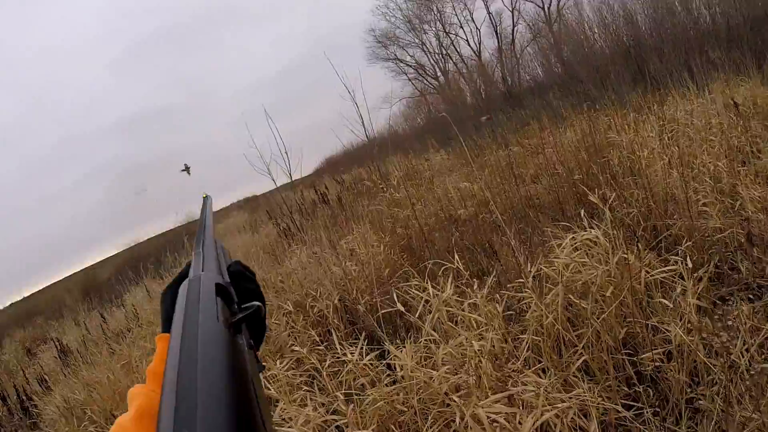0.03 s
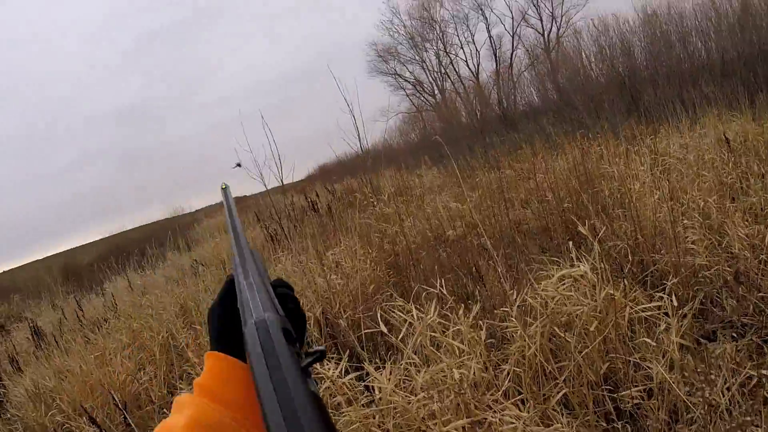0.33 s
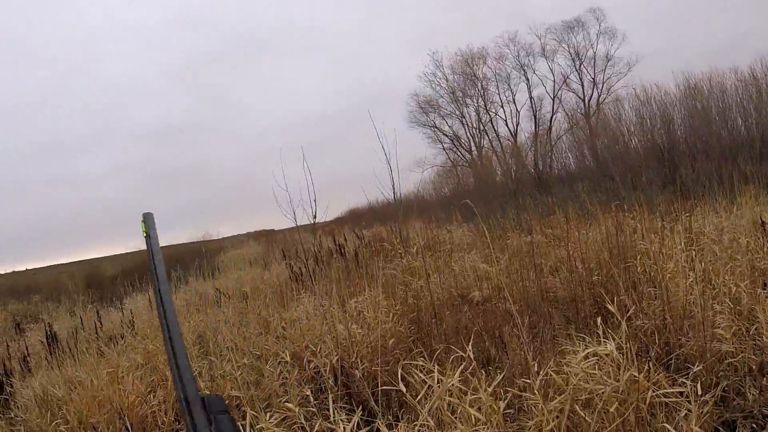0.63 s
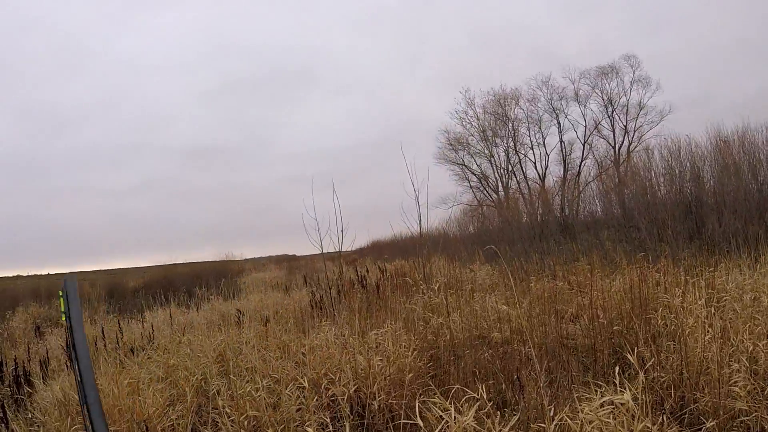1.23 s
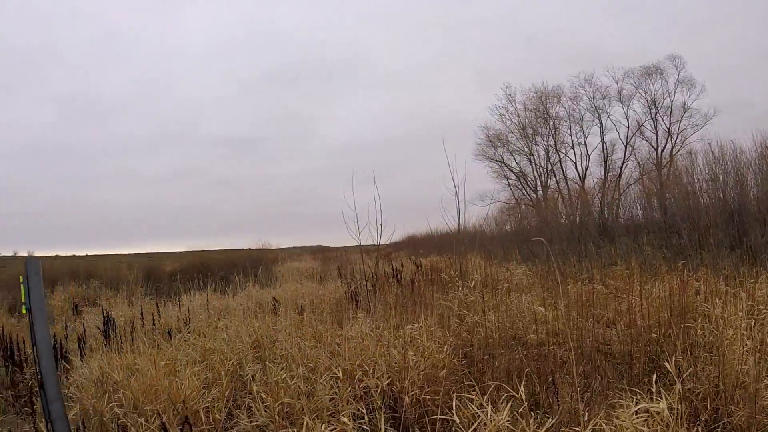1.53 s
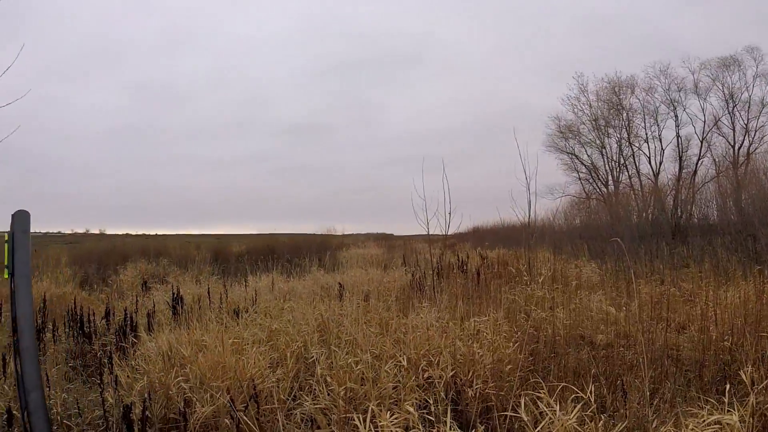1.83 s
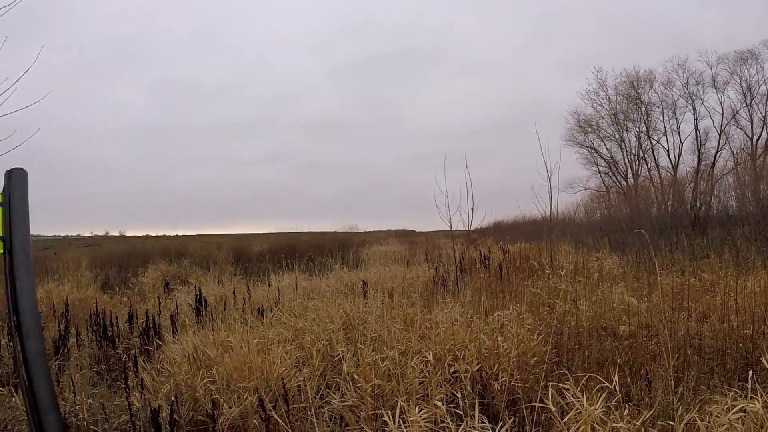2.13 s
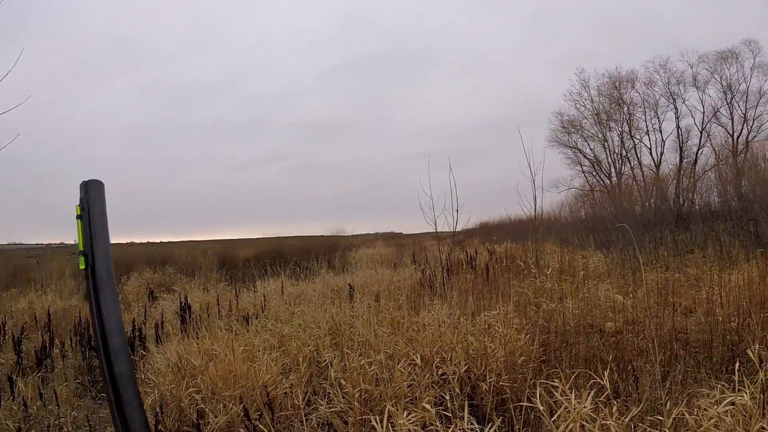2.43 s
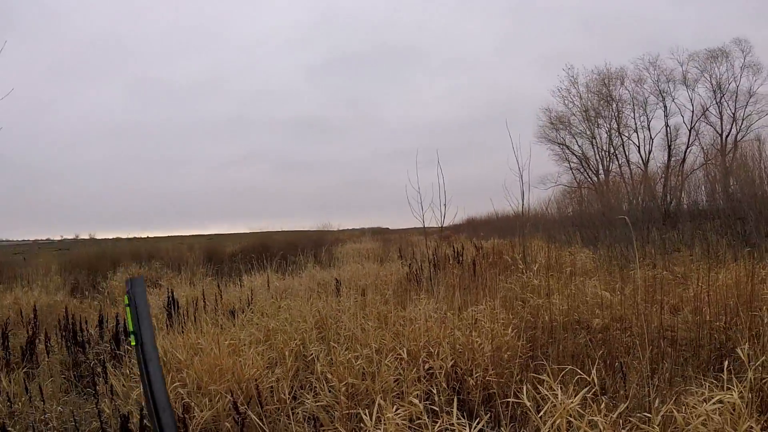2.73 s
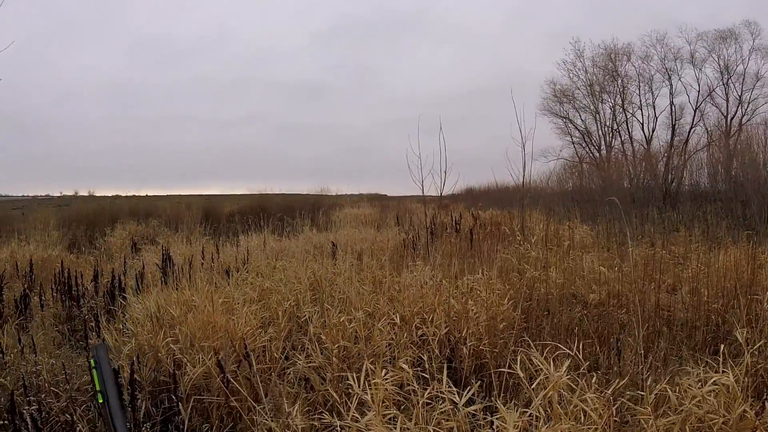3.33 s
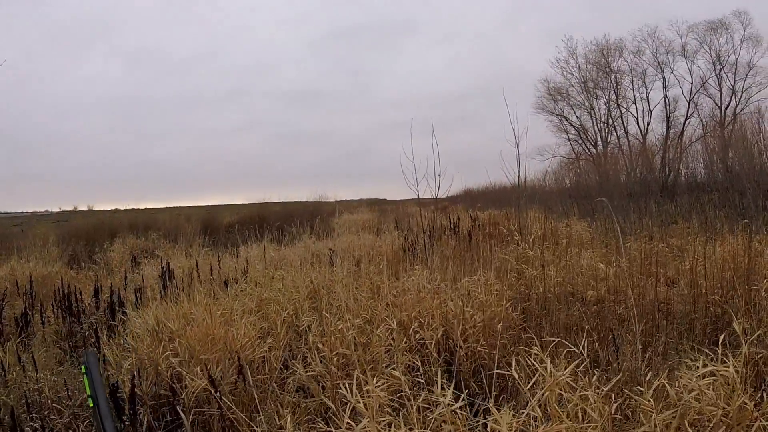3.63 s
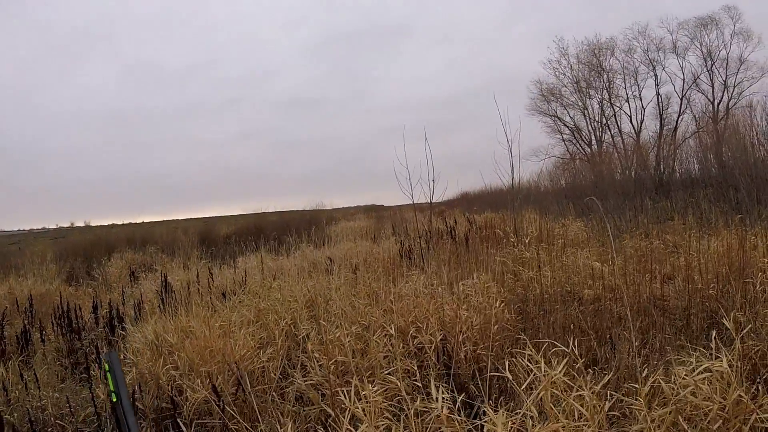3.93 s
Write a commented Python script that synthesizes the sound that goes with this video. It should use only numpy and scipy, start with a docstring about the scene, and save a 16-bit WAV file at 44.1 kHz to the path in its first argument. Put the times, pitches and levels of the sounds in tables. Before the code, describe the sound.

A shotgun's action clacks sharply as the shot's brief echo dies over an open field. Soft handling bumps and a metallic click follow, then wind gusts rumble ever harder on the close microphone, with hiss and a faint distant bird.

```python
"""A shotgun's echo dies away over a reed field while the gun's action clacks.
Soft bumps and small ticks follow as the gun is lowered, then a catch clicks; clack and click
are impacts that ring the modes of the metal. Turbulent gusts buffet the microphone ever harder,
a far bird calls faintly, and background hiss swells as the recorder's gain recovers after the shot."""
import sys
import numpy as np
from scipy import signal
from scipy.fft import rfft, irfft, next_fast_len
from scipy.io import wavfile
from scipy.ndimage import uniform_filter1d, map_coordinates

SR = 44100
rng = np.random.default_rng(int(sys.argv[2]) if len(sys.argv) > 2 else 0)


def wav_record(signal):
    """Record a signal, one row per channel, as 16-bit PCM in the file named by sys.argv[1]."""
    frames = np.transpose(np.atleast_2d(signal))
    bounded = np.clip(frames, -1, 1)
    # unit amplitude maps onto the largest positive 16-bit level
    quanta = np.round(bounded * 32767).astype(np.int16)
    wavfile.write(sys.argv[1], SR, quanta)


N = 176400
T = np.arange(N) / SR

# impacts in the action and of the catch on its seat (time [s], relative level [dB])
ACTION_IMPACTS = [(0.0082, -19), (0.0087, -24), (0.0092, -24), (0.0102, -28), (0.0107, -29), (0.0122, -34),
                  (0.0185, -42), (0.0284, -44), (0.0322, -39.5), (0.0365, -39), (0.0478, -40), (0.138, -52),
                  (0.165, -59)]
CATCH_IMPACTS = [(1.6903, -23), (1.7205, -24), (1.7212, 0), (1.7216, -4), (1.7220, -8), (1.7224, -6),
                 (1.7228, -3), (1.7236, -14), (1.7292, -26), (1.7322, -28)]
# modes of the action and of the steel (frequency [Hz], relative level [dB], decay time T60 [s])
ACTION_MODES = [(348, -6.5, 0.032), (526, -12, 0.012), (815, -17.5, 0.03), (1340, -31, 0.013),
                (1890, -12, 0.013), (2105, -11, 0.018), (2600, -17.5, 0.055), (3160, -1, 0.0075),
                (3830, -49, .55), (3870, -15, 0.0042), (5360, -1, 0.0033), (6000, -6, 0.0065),
                (6650, -1.5, 0.0078), (7460, -33, 0.04)]
STEEL_MODES = [(750, -32, 0.04), (1030, -6.5, 0.04), (1497, -15.5, 0.06), (1840, -23, 0.03),
               (2105, -11.5, 0.032), (2720, -3, 0.0036), (3160, -13, .016), (3560, -13, 0.012),
               (4420, -9, 0.0057), (5430, -3, 0.0076), (5710, -13, 0.0061), (6830, -13, 0.011),
               (7160, -23, 0.0065), (7960, -16.5, 0.0087), (9450, -21, 0.008), (10070, -8.5, 0.0021),
               (13800, -12, .005)]
# noisy ring after the click (frequency [Hz], relative level [dB])
CATCH_RING_SPECTRUM = [(600, -19), (1000, -16), (1500, -20), (2600, 0), (4000, -1), (5400, 1), (7000, -4),
                       (8600, -3), (10200, 0), (11500, -23), (14000, -22)]
# near, far and tree-line reflections of the shot (frequency [Hz], relative level [dB])
NEAR_ECHO_SPECTRUM = [(200, -16), (600, 6.5), (1100, -13), (2000, 4), (3000, -8), (4500, -17), (6200, -8),
                      (7800, -16), (9500, -32), (14000, -38)]
FAR_ECHO_SPECTRUM = [(200, 2), (700, 5), (1100, -3), (1700, 0), (3000, -5.5), (4800, -18), (6200, -9),
                     (9000, -24), (14000, -45)]
SLAP_SPECTRUM = [(400, -23), (750, 3), (1400, 0), (2200, -9), (3200, -15), (8000, -40), (11000, -69)]

# soft bumps at the microphone (time [s], relative level [dB], frequency [Hz], scuff re bump [dB])
BUMPS = [(0.089, -32, 173, -3), (0.107, -18.5, 110, -15), (0.17, -27, 162, -20), (0.218, -29.5, 287, -4.5),
         (0.239, -26, 233, -14), (0.248, -19, 137, -19.5), (0.301, -35, 280, -5), (0.43, -39, 280, 0.5),
         (0.469, -35, 313, -3.5), (0.495, -25, 188, -10), (0.592, -31.5, 196, -3.5),
         (0.641, -36.5, 248, -8), (0.751, -39, 230, -9), (0.819, -25, 55, -19), (0.824, -32.5, 221, -4),
         (0.866, -18, 134, -22), (1.467, -22, 294, -10), (1.484, -20, 121, -4.5), (1.942, -13.5, 115, -27),
         (1.954, -12.5, 102, -17), (1.955, -15.5, 330, -9), (2.099, -9, 88.6, -40), (2.46, -5.5, 57.7, -34)]
# ticks of stalks and clothing (time [s], level [dB])
TICKS = [(0.3601, -57), (0.4769, -62), (0.483, -58), (0.589, -60), (0.612, -60), (0.657, -56),
         (0.6799, -49), (1.4447, -57), (1.6173, -49.5)]
# rustles of stalks and clothing (time [s], level [dB], half-width [s])
RUSTLES = [(0.624, -68.5, 0.089), (2.362, -52, .006), (2.946, -52, 0.014), (3.7, -75, .03)]
# noise of the scuffs, and of the ticks and rustles (frequency [Hz], relative level [dB])
SCUFF_SPECTRUM = [(100, 10), (250, 10), (450, -10), (800, -26.5), (1500, -62), (4000, -55)]
STALK_SPECTRUM = [(500, -15), (1500, -19), (2500, -4.5), (3500, -4.5), (4400, -8), (5400, 10.5),
                  (7000, -0.5), (9500, -7), (11500, -41), (14000, -45)]

# envelopes of the wind's pressure, lowest band first (time [s], relative level [dB])
SWAY_ENVELOPE = [(0.0, -39), (0.56, -52.5), (0.78, -42), (0.8, -32.5), (1.01, -48.5), (1.26, -29.5),
                 (1.59, -34.5), (1.97, -26.5), (2.19, -37), (2.85, -22.5), (3.61, -28.5), (3.64, -20.5),
                 (3.97, -24), (4.0, -26.5)]
RUMBLE_ENVELOPE = [(0, -40), (0.3, -46), (0.7, -45.5), (0.86, -36.5), (1.02, -54.5), (1.15, -38.5),
                   (1.27, -23), (1.42, -28.5), (1.49, -22), (1.57, -41.5), (1.63, -30.5), (1.75, -40),
                   (1.8, -27.5), (1.9, -42.5), (1.97, -30), (2.09, -42.5), (2.2, -36), (2.42, -39.5),
                   (2.47, -25), (2.53, -18.5), (2.61, -32), (2.66, -19.5), (2.95, -19.5), (3.045, -30.5),
                   (3.075, -16.5), (3.45, -15.5), (3.6, -19.5), (3.66, -19), (3.85, -30.5), (3.94, -22.5),
                   (4, -44)]
FLUTTER_ENVELOPE = [(0, -85), (0.55, -53), (0.75, -63), (0.85, -59), (1.02, -89), (1.15, -49.5),
                    (1.26, -43), (1.42, -35), (1.49, -38), (1.54, -49.5), (2.0, -51), (2.2, -52.5),
                    (2.43, -46.5), (2.52, -32), (2.56, -42), (2.62, -28.5), (2.72, -32), (2.76, -33),
                    (2.84, -27), (2.95, -29.5), (2.99, -33.5), (3.055, -44), (3.1, -25.5), (3.15, -32),
                    (3.205, -31), (3.22, -24.5), (3.28, -28), (3.35, -21.5), (3.42, -25), (3.485, -28.5),
                    (3.515, -23.5), (3.56, -26), (3.6, -40.5), (3.66, -36), (3.78, -47), (3.9, -43.5),
                    (3.945, -29.5), (4, -70)]
# bands of the wind's pressure (frequency [Hz], relative level [dB])
SWAY_SPECTRUM = [(14, -6.5), (22, 3.5), (38, -8.5), (55, 2), (75, -24), (120, -60.5)]
RUMBLE_SPECTRUM = [(40, -30.5), (60, 1.5), (90, 3.5), (130, -5), (175, -13), (260, -28.5), (400, -40.5)]
FLUTTER_SPECTRUM = [(90, -21.5), (140, -2), (180, 3.5), (250, -5.5), (350, -14), (500, -26.5), (800, -35.5),
                    (1300, -50), (2500, -71)]
TEAR_SPECTRUM = [(200, -20), (330, -8), (450, 1), (650, -4.5), (900, -16), (1300, -19.5), (2500, -75)]

# notes of the far bird (time [s], level [dB], frequency [Hz])
BIRD_NOTES = [(0.372, -70, 1160), (0.428, -66, 1175), (2.997, -41.5, 1132), (3.063, -49, 1083)]
# background hiss and sizzle, rising as the recorder's gain recovers (time [s], relative level [dB])
HISS_ENVELOPE = [(0, -82), (0.25, -81), (0.45, -74), (0.65, -75), (0.85, -68.5), (1.05, -62.5),
                 (1.3, -64.5), (1.65, -62), (1.95, -58), (2.2, -56), (2.42, -55), (2.65, -55.5),
                 (3.2, -56.5), (3.65, -54.5), (4, -57)]
SIZZLE_ENVELOPE = [(0, -106), (0.3, -84), (0.62, -73.5), (1.1, -66.5), (1.7, -70), (2.2, -66),
                   (2.33, -59.5), (2.5, -56.5), (2.8, -65.5), (4, -65.5)]
# the background's broad hiss, narrow sizzle and soft body (frequency [Hz], relative level [dB])
HISS_SPECTRUM = [(530, -28), (900, 0), (1720, -5), (2570, -8), (4160, -14), (5140, -10), (5450, -8),
                 (6060, -8), (10200, -13.5), (11400, -20.5), (13200, -22.5), (15000, -28.5)]
SIZZLE_SPECTRUM = [(4300, -38.5), (4800, -10.5), (5250, -1), (5750, -5), (6500, -19.5), (8000, -19),
                   (10000, -41)]
BODY_SPECTRUM = [(150, -1), (400, 5.5), (800, 2), (1100, -20), (2000, -34)]


def gun():
    """Impact excitation: the action clacks; later a catch chatters home and rings the steel."""
    clack = amp(-5.5) * struck(ACTION_IMPACTS, ACTION_MODES, low_hz=220, high_hz=7660)
    click = amp(-17) * struck(CATCH_IMPACTS, STEEL_MODES, low_hz=670, high_hz=10200)
    noisy_ring = bursts([(1.7215, -39.5)], CATCH_RING_SPECTRUM, t60=0.05)
    return clack + click + noisy_ring


def echo():
    """Reflection: a brief near tail, a fainter and longer far one, and a slap from the tree line."""
    near = noise(NEAR_ECHO_SPECTRUM) * amp(-41.5 + 3.5 * wobble(165))
    near *= held_decay(hold_s=0.013, t60=0.097)
    far = noise(FAR_ECHO_SPECTRUM) * amp(-65.5 + 1.7 * wobble(202))
    far *= held_decay(hold_s=0.16, t60=0.41)
    slap = bursts([(0.137, -50)], SLAP_SPECTRUM, t60=0.04)
    return near + far + slap


def wind():
    """Turbulence: eddies press on the microphone as slow sway, rumble, lumpy flutter and tearing."""
    sway = even(noise(SWAY_SPECTRUM), size=4500) * amp(curve(SWAY_ENVELOPE) + 4.5)
    rumble = even(noise(RUMBLE_SPECTRUM), size=1800)
    rumble *= amp(curve(RUMBLE_ENVELOPE) + 1.17 + 1.41 * wobble(35))
    gust_db = curve(FLUTTER_ENVELOPE)
    flutter = even(noise(FLUTTER_SPECTRUM) * amp(2.3 * wobble(70)), size=3000) * amp(gust_db + 1.24)
    # tearing grows faster than flutter, so it is heard only in the hardest gusts
    tear_growth, full_gust_db = 1.4, -26
    tear_db = -50.5 + tear_growth * (gust_db - full_gust_db)
    tear = even(noise(TEAR_SPECTRUM) * amp(5.5 * wobble(110)), size=2500) * amp(tear_db)
    return sway + rumble + flutter + tear


def bumps():
    """Damped oscillation: each bump is a low push of a few cycles with a scuff of noise."""
    ring_cycles = 4.93
    push, scuff_envelope = np.zeros(N), np.zeros(N)
    for start, db, hz, scuff_db in BUMPS:
        age = T - start
        onset = (1 - decay(np.maximum(age, 0), t60=2 / hz)) ** 2
        push += amp(db) * onset * decay(age, t60=ring_cycles / hz) * np.sin(2 * np.pi * hz * age)
        scuff_envelope += amp(db + scuff_db) * decay(age, t60=0.055)
    scuff = uniform_filter1d(scuff_envelope, size=80) * even(noise(SCUFF_SPECTRUM), size=500)
    return uniform_filter1d(push, size=30) + scuff


def stalks():
    """Friction and light impact: stalks and clothing rustle in short swells and tick."""
    rustle = noise(STALK_SPECTRUM) * sum(amp(db) * swell(time, width) for time, db, width in RUSTLES)
    return rustle + bursts(TICKS, STALK_SPECTRUM, t60=0.02)


def bird():
    """Random modulation of phase and amplitude makes a far bird's short notes raspy."""
    waver = 0.25 * wobble(260)
    rasp = 1 + 0.2 * wobble(530)
    return rasp * sum(amp(db) * swell(time, width=0.009) * np.sin(2 * np.pi * hz * T + waver)
                      for time, db, hz in BIRD_NOTES)


def background_hiss():
    """Gain recovery: hiss swells along set envelopes, as the recorder's gain returns after the shot."""
    sheen_hz, sheen_growth, full_hiss_db = 11000, 0.72, -59.5
    level_db = curve(HISS_ENVELOPE)
    broad = noise(HISS_SPECTRUM)
    sheen = filtered(broad, lambda hz: hz > sheen_hz)
    sheen_gain = amp(sheen_growth * np.minimum(level_db - full_hiss_db, 0))  # duller while faint
    broad = broad - sheen + sheen * sheen_gain
    hiss = (broad + noise(BODY_SPECTRUM)) * amp(level_db + 0.93 * wobble(14))
    sizzle = noise(SIZZLE_SPECTRUM) * amp(curve(SIZZLE_ENVELOPE) + 2.0 * wobble(40))
    return hiss + sizzle


def struck(impacts, modes, low_hz, high_hz):
    """Modal superposition: every impact rings the same damped modes, within the band it excites."""
    t = T[:SR // 8]
    ring = sum(amp(db) * decay(t, t60) * np.sin(2 * np.pi * hz * t) for hz, db, t60 in modes)
    ring = signal.sosfilt(signal.butter(2, low_hz, "high", fs=SR, output="sos"), ring)
    ring = signal.sosfilt(signal.butter(5, high_hz, fs=SR, output="sos"), ring)
    impulses = np.zeros(N)
    for time, db in impacts:
        impulses[round(time * SR)] += amp(db)
    return signal.fftconvolve(impulses, ring)[:N]


def bursts(events, spectrum, t60):
    """Transients: shaped noise decays from each (time [s], level [dB]) event."""
    return noise(spectrum) * sum(amp(db) * decay(T - time, t60) for time, db in events)


def noise(spectrum):
    """Spectral shaping: noise of rms 1 that rolls off beyond the ends of its spectrum."""
    freqs, db = np.transpose(spectrum)
    freqs = np.r_[freqs[0] / 2, freqs, freqs[-1] * 2]
    db = np.r_[db[0] - 20, db, -120]
    white = rng.standard_normal(N)
    return unit(filtered(white, lambda hz: amp(np.interp(np.log(hz + 1), np.log(freqs), db))))


def filtered(x, response):
    """Linear filtering: the spectrum of x is multiplied by a frequency response."""
    size = next_fast_len(N + SR // 2)
    return irfft(rfft(x, size) * response(np.fft.rfftfreq(size, 1 / SR)), size)[:N]


def even(x, size):
    """Division by the running rms, over size samples, evens out slow chance swells."""
    power = uniform_filter1d(uniform_filter1d(x * x, size), size)
    return unit(x / np.sqrt(np.abs(power) + 0.02))


def decay(t, t60):
    """Exponential decay from t = 0, by 60 dB in t60 seconds."""
    return (t >= 0) * np.exp(-np.log(1000) * np.maximum(t, 0) / t60)


def held_decay(hold_s, t60):
    """A plateau followed by exponential decay."""
    return decay(np.maximum(T - hold_s, 0), t60)


def swell(time, width):
    """A Gaussian rise and fall around a time."""
    return np.exp(-((T - time) / width) ** 2)


def wobble(rate):
    """Spline interpolation of random values, rate of them a second."""
    return map_coordinates(rng.standard_normal(1024), [T * rate], mode="wrap")


def curve(points):
    """Linear interpolation of (time [s], level [dB]) points at every sample."""
    return np.interp(T, *np.transpose(points))


def amp(db):
    """Decibels to amplitude ratio."""
    return 10 ** (np.asarray(db) / 20)


def unit(x):
    """Normalisation to rms 1."""
    return x / np.sqrt(np.mean(x ** 2) + 1e-20)


def scene():
    """Superposition: all sources add in one channel."""
    return (wind() + background_hiss() + echo() + gun() + bumps() + stalks() + bird())[None]


def record(dry):
    """Soft saturation rounds the highest peaks; a steep low-pass limits the bandwidth."""
    ceiling, knee, top_hz = 0.53, 6, 15000
    rounded = dry[0] / (1 + np.abs(dry[0] / ceiling) ** knee) ** (1 / knee)
    padded = np.pad(rounded, (0, SR // 10), mode="reflect")
    return filtered(padded, lambda hz: 1 / np.sqrt(1 + (hz / top_hz) ** 120))[None]


dry = scene()
out = record(dry)
wav_record(out)
```